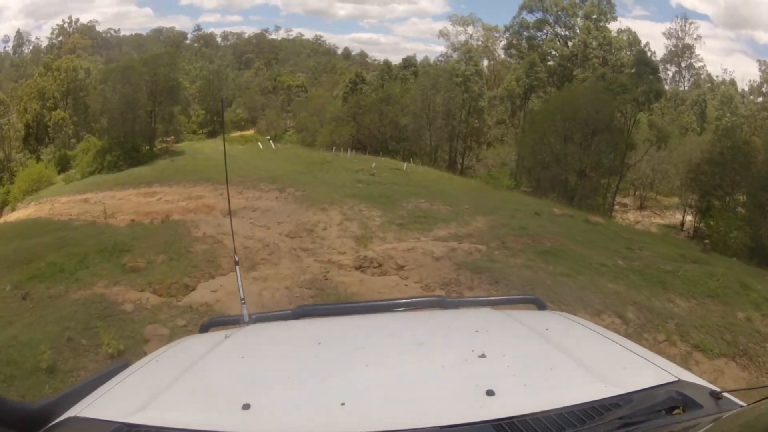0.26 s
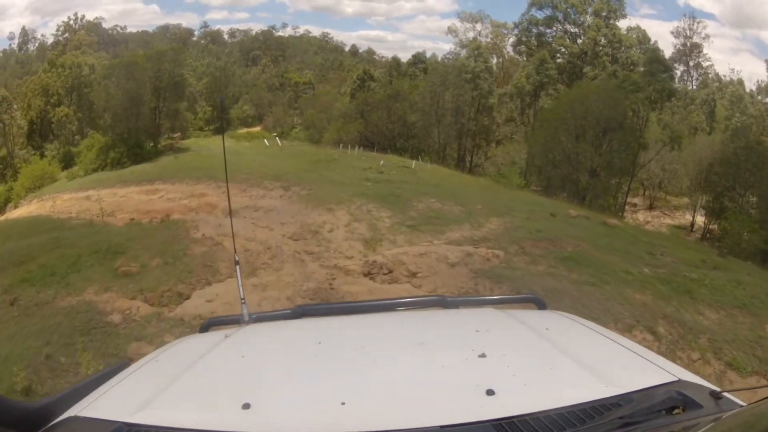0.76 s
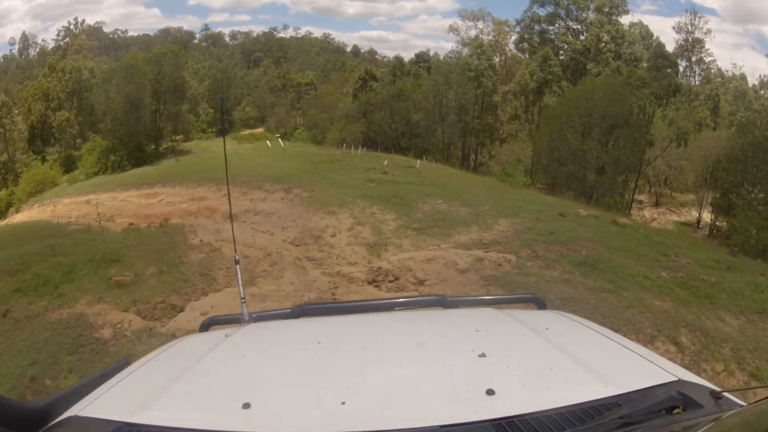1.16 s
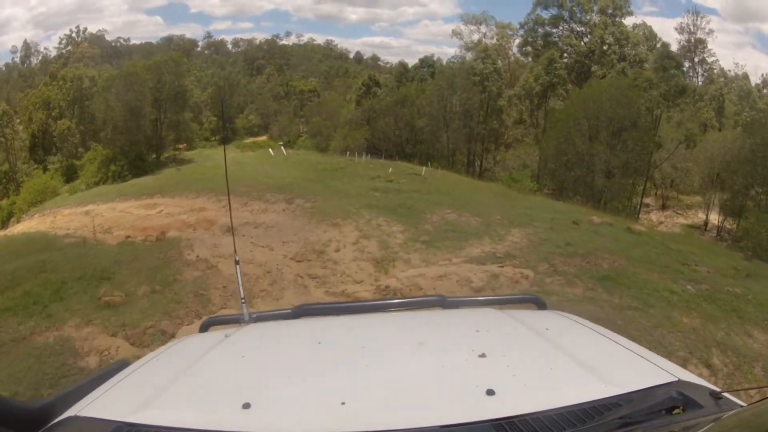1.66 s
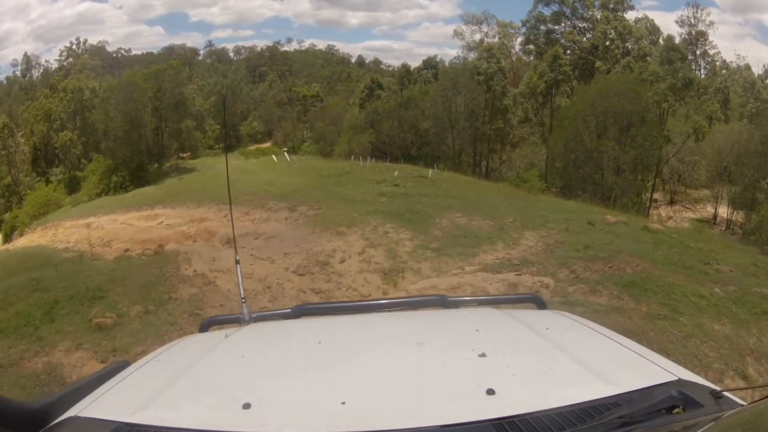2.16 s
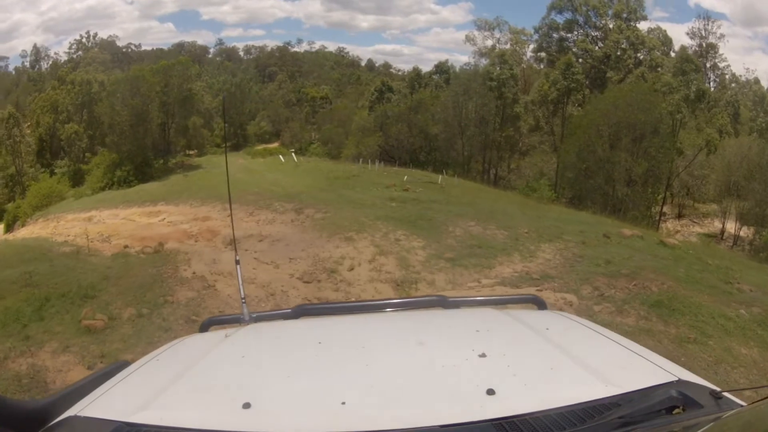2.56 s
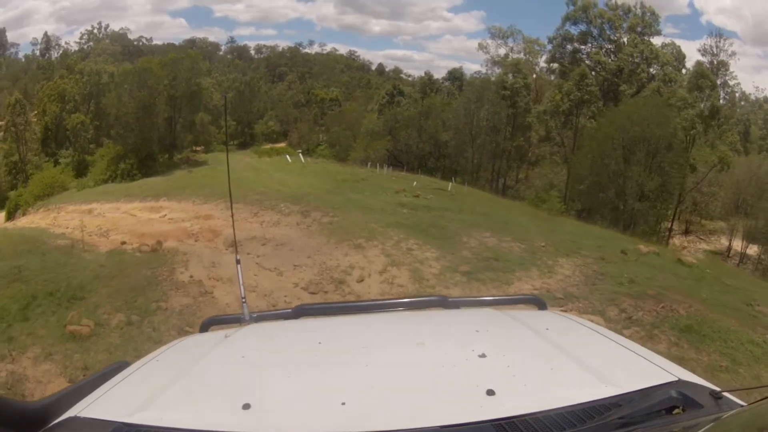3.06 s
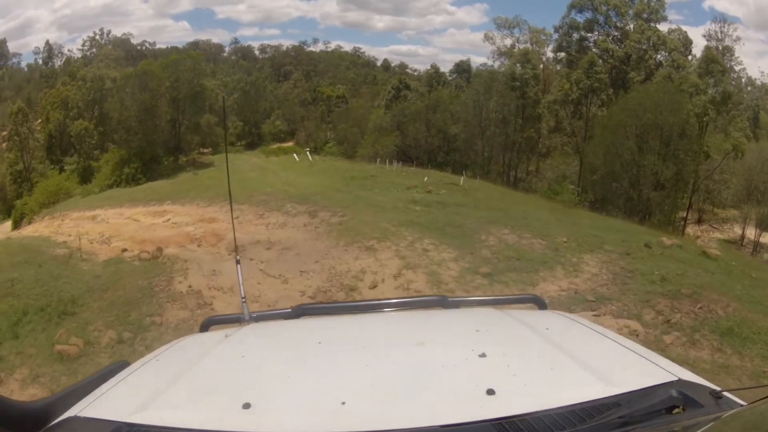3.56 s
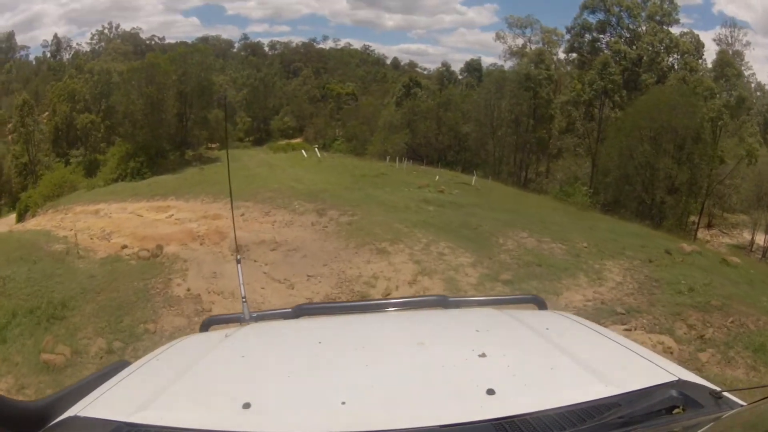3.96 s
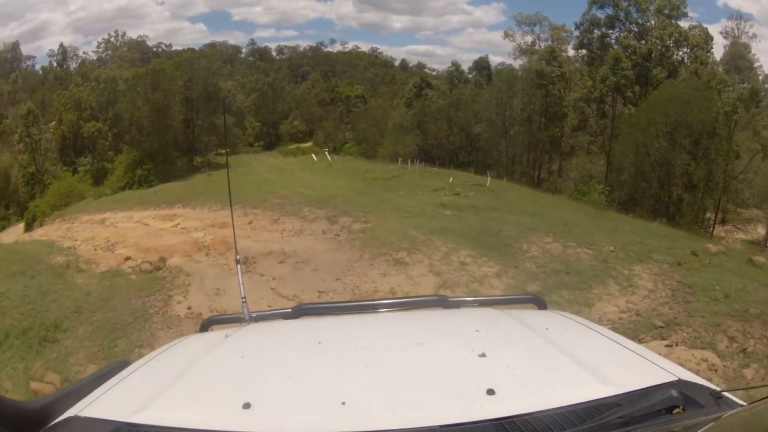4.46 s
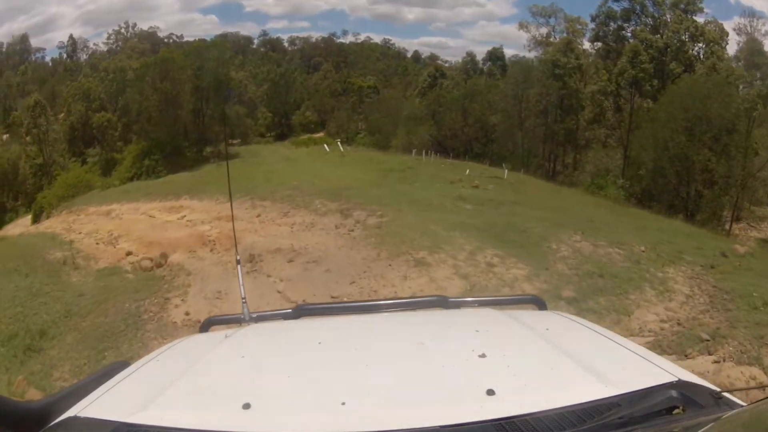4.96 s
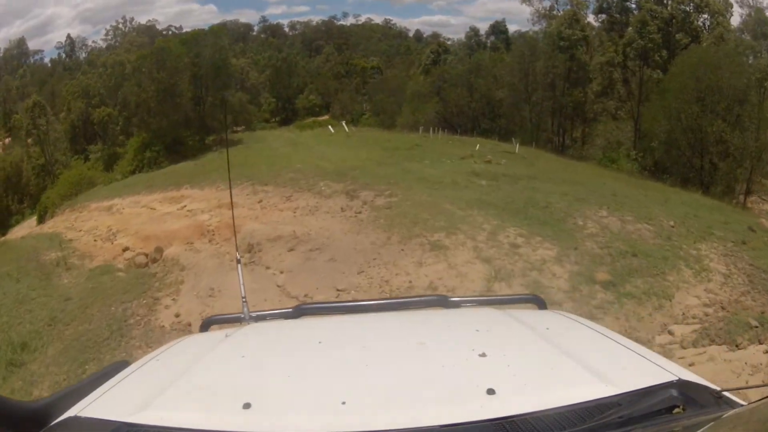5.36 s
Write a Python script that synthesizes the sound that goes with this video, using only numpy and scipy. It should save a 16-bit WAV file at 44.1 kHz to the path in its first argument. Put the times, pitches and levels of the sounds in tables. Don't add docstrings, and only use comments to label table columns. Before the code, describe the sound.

A four-cylinder diesel idles slowly along a dirt track, picked up through the body by a small sealed camera, so it is close, boxy and bass-heavy with thin, grainy treble. Throughout, about twenty-four firings a second make a deep shuddering throb, with uneven metallic clatter around two kilohertz and dull tyre rumble. From 0 to 1.5 s the ride is loosest: squeaks at 0.1 and 0.26, low trim knocks near 0.17, 0.5, 0.9, 1.1 and 1.4, faint clinks, and dry ticks around 0.3-0.4 and 1.2. A clonk, squeak and cluster of ticks return at 2.4-2.5, then a knock and clinks around 2.7-2.9. Meanwhile a roof drone near 75 Hz, at first in short swells, settles in. The idle quickens slightly after 2.5 s; a few ticks follow near 3.4. The throb dips briefly around 3.8 and 5.3, then swells strongly at the end.

```python
import sys
import numpy as np
from scipy import signal
from scipy.fft import rfft, irfft, next_fast_len
from scipy.io import wavfile
from scipy.ndimage import uniform_filter1d, map_coordinates

SR = 44100
rng = np.random.default_rng(int(sys.argv[2]) if len(sys.argv) > 2 else 0)


def generate_wav(signal):
    frames = np.transpose(np.atleast_2d(signal))
    scaled = np.clip(frames, -1, 1) * 32767
    pcm = np.round(scaled).astype(np.int16)
    wavfile.write(sys.argv[1], SR, pcm)


def amplitude_ratio(level_db):
    exponent = np.asarray(level_db, float) / 20
    return 10 ** exponent


N = 246945


def unit(x):
    return x / np.sqrt(np.mean(x ** 2) + 1e-20)


def curve(rows):
    s, value = np.transpose(rows)
    return uniform_filter1d(np.interp(np.arange(N) / SR, s, value), size=SR // 30)


def swells(rows):
    t = np.arange(N) / SR
    return sum(db * np.exp(-.5 * ((t - s) / half) ** 2) for s, db, half in rows)


def wobble(rate):
    return map_coordinates(rng.standard_normal(int(N * rate / SR) + 4), [np.arange(N) * rate / SR])


def filtered(x, response):
    m = next_fast_len(N + SR // 2)
    return irfft(rfft(x, m) * response(np.fft.rfftfreq(m, 1 / SR)), m)[..., :N]


def coloured(x, points):
    f, db = np.transpose(points)
    return unit(filtered(x, lambda hz: amplitude_ratio(np.interp(np.log(hz + 1), np.log(f + 1), db))))


def resonant(x, modes):
    def response(f):
        total = 0
        for k, (centre, width, db) in enumerate(modes):
            damping = 1j * f * width
            total = total + (-1) ** k * amplitude_ratio(db) * damping / (centre ** 2 - f ** 2 + damping)
        return total
    return unit(filtered(x, response))


def taps(rows, snap, crack, gain_db):
    out, t = np.zeros(N + SR), np.arange(SR // 5) / SR
    for s, db, hz, t60 in rows:
        fall = amplitude_ratio(-60 * t / max(t60, .003)) * (1 - np.exp(-t / 0.00007))
        tap = fall * (np.sin(2 * np.pi * hz * t) + crack * rng.standard_normal(len(t)))
        out[round(s * SR):][:len(t)] += amplitude_ratio(db + gain_db) * (tap + snap * (t == 0))
    return out[:N]


# (time [s], firing rate [Hz])
SPEED = [(0.0, 24.8), (0.23, 22.67), (0.5, 24.27), (0.76, 24.83), (1.08, 23.33), (1.5, 23.67),
         (1.98, 24.84), (2.11, 24.98), (2.37, 23.13), (2.7, 25.7), (3.26, 24.39), (3.7, 26), (3.94, 25.75),
         (4.18, 25.08), (4.44, 25.25), (4.66, 24.91), (4.91, 25.75), (5.6, 26.31)]


def engine_speed():
    rate_hz = curve(SPEED)
    return rate_hz, np.cumsum(rate_hz) / SR + .88


# (time [s], change [dB], half length [s])
SHAKE_SWELLS = [
    (1.85, -4.5, 0.14),
    (2.66, 2.5, 0.13),
    (2.87, -6, .04),
    (3.15, 4, 0.11),
    (3.8, -11, 0.042),
    (3.94, 3, 0.051),
    (4.4, 4, 0.12),
    (5.08, -3, .06),
    (5.28, -10, 0.048),
    (5.53, 8.5, 0.11),
]


def cab_level(firings):
    cab_hz, cab_width_hz, cab_db = 23.79, 2.12, -33.5
    frame_share, frame_lead = 0.22, 1.7
    push = np.exp(2j * np.pi * firings)
    pole = np.exp((2j * np.pi * cab_hz - np.pi * cab_width_hz) / SR)
    sprung = signal.lfilter([1 - abs(pole)], [1, -pole], push)
    frame = frame_share * np.exp(1j * frame_lead) * push
    return cab_db + 20 * np.log10(np.abs(sprung + frame)) + swells(SHAKE_SWELLS)


# (time [s], level [dB])
BOOM = [(0, -66), (1.7, -60.5), (2.5, -46.5), (3.0, -43.5), (5.6, -42)]
# (time [s], change [dB], half length [s])
FLEXES = [(.08, 10, 0.026), (.26, 25.5, 0.021), (.39, 26, 0.04), (.54, 21, 0.034), (1.36, 11, .03),
          (1.57, 20.5, .03), (1.87, 14.5, 0.042), (2.17, 11.5, 0.088), (2.33, -18, .03), (2.42, 7, 0.039),
          (2.7, 5, .1), (3.15, 4.5, 0.029), (3.23, -9.5, .02), (3.34, 5, 0.034), (3.42, -7.5, 0.024),
          (3.6, -7, .03), (4.13, 4, .08), (4.33, -13, 0.027), (4.59, 1.5, 0.038), (4.76, -4, .07)]


def roof_level():
    return curve(BOOM) + swells(FLEXES)


# (multiple of firing rate [-], slow level re growl [dB], fast level re growl [dB])
EXHAUST = [(2, -11, 0), (2.5, -12, -5.5), (3.5, -3, -10), (4, 2.5, -8), (5, -4, -3), (6, -5, -8),
           (7, -0.5, 0.5), (8, -3.5, -2.5), (9, -8.5, -9), (11, -8, -19.5), (13, -19.5, -16.5)]
# (centre [Hz], width [Hz], level re mean growl [dB])
MOUNT = (487, 32.8, -7.5)


def orders(firings, rate_hz):
    turn = 2 * np.pi * firings
    growl_db = -55 + wobble(12)

    def wavering(k):
        phase = k * (turn + .012 * wobble(6)) + rng.uniform(0, 7)
        return amplitude_ratio(1.5 * wobble(4)) * np.cos(phase)

    lag = 2 * np.pi * (.1 + .15 * (rate_hz - 23.5))
    shake = amplitude_ratio(cab_level(firings)) * np.cos(turn - lag)
    boom = amplitude_ratio(roof_level()) * np.cos(3 * turn + 1.85 + 0.6 * wobble(4.15))
    fast = np.clip((rate_hz - 24.2) / 1.2, 0, 1)
    growl = sum(amplitude_ratio(slow_db + fast * (fast_db - slow_db)) * wavering(k) for k, slow_db, fast_db in EXHAUST)
    hz, width, db = MOUNT
    whine = sum(wavering(k) / (1 + (2 * (k * rate_hz - hz) / width) ** 2) for k in range(18, 22))
    return np.sqrt(2) * (shake + boom + amplitude_ratio(growl_db) * growl + amplitude_ratio(growl_db.mean() + db) * whine)


CYLINDERS = [-2.5, -1, 2.5, 1.7]


def strokes(firings, spread, valve_db, scatter_db):
    stroke = firings.astype(int)
    size = rng.standard_normal((stroke[-1] + 1, 2))[stroke]
    part = firings - stroke

    def hump(centre, width):
        return np.exp(-.5 * ((part - centre) / width) ** 2)

    burn = amplitude_ratio(np.array(CYLINDERS)[stroke % 4] + scatter_db * size[:, 0]) * hump(0.3, spread)
    valve = amplitude_ratio(valve_db + scatter_db * size[:, 1]) * hump(0.73, 0.19)
    return burn + valve


# (centre [Hz], width [Hz], level [dB])
BLOCK = [(1260, 178, -13), (1540, 71, -8), (1673, 84, -10.5), (2020, 114, -5), (2240, 45, -1.5),
         (2534, 50, -5.5), (2820, 130, -14.5), (3268, 95, -10.5), (3752, 95, -12), (4530, 120, -23.5),
         (5250, 60, -22)]
# (frequency [Hz], level per Hz [dB])
HISS = [(500, -31), (900, -7.5), (1800, -19.5), (2300, 6), (3500, -6.5), (5500, -10.5), (9000, -12)]
# (centre [Hz], width [Hz], level [dB])
CASE = [(484, 36, -4.5), (863, 23.3, -8), (347, 47, -4.5)]


def clatter(firings):
    gas_hz = 2049
    drift = np.cumsum(30 * wobble(110)) / SR
    ring = np.cos(2 * np.pi * (gas_hz * np.arange(N) / SR + drift))
    knock = unit(strokes(firings, spread=0.14, valve_db=-2.5, scatter_db=3.5) * ring)
    beat = .9 + strokes(firings, spread=.11, valve_db=-2, scatter_db=1.2)

    def gritty_noise():
        return beat * amplitude_ratio(1.5 * wobble(250)) * rng.standard_normal(N)

    rung = resonant(gritty_noise(), BLOCK)
    broad = coloured(gritty_noise(), HISS)
    mount = resonant((beat + 0.35) * rng.standard_normal(N), CASE)
    mix = amplitude_ratio(-3.0) * knock + amplitude_ratio(-1.5) * rung + amplitude_ratio(-0.5) * broad + amplitude_ratio(-3.0 + wobble(2.87)) * mount
    return amplitude_ratio(-58.5) * mix


# (time [s], peak [dB], ring [Hz], t60 [s])
KNOCKS = [
    (0.169, -39.5, 283, 0.06),
    (0.533, -40.5, 266, 0.044),
    (0.891, -55, 460, 0.082),
    (0.928, -43.5, 460, 0.12),
    (1.135, -40, 241, 0.081),
    (1.363, -44, 505, 0.093),
    (1.442, -41, 257.5, 0.044),
    (2.738, -45.5, 480, 0.068),
]
# (time [s], peak [dB], ring [Hz], t60 [s])
CLINKS = [
    (0.186, -52, 864, 0.085),
    (0.361, -56, 860, 0.1),
    (0.862, -59, 850, 0.096),
    (1.198, -53.5, 860, 0.16),
    (1.365, -57, 850, 0.11),
    (2.198, -55.5, 870, 0.0772),
    (2.739, -57.5, 841, 0.11),
    (2.949, -51.5, 843.3, 0.077),
]
# (time [s], peak [dB], ring [Hz], t60 [s])
CLONKS = [
    (1.369, -50, 663, 0.075),
    (2.361, -48.5, 646, 0.064),
]
# (time [s], peak [dB], ring [Hz], t60 [s])
SQUEAKS = [
    (0.1115, -48, 1800, 0.06),
    (0.2644, -46.5, 1710, 0.051),
    (2.4442, -50, 1710, 0.041),
]


def trim_contacts():
    return taps(KNOCKS + CLINKS + CLONKS + SQUEAKS, snap=0, crack=0.074, gain_db=-0.5)


# (time [s], peak [dB], ring [Hz], t60 [s])
TICKS = [(.2662, -52, 3700, .05), (.3055, -54, 3460, .015), (.3468, -53, 3800, .01),
         (.352, -55, 3500, .015), (.4364, -46, 3780, .015), (1.192, -56, 3270, .03),
         (1.2375, -54, 3030, .015), (2.4398, -51, 4900, .012), (2.4803, -49, 3640, .022),
         (2.52, -44, 4400, .02), (2.563, -57, 3300, .03), (3.3283, -51, 3740, .02),
         (3.3658, -53, 3010, .03), (3.508, -56, 3830, .025)]


def mount_ticks():
    impacts = taps(TICKS, snap=9.4, crack=3.3, gain_db=-1.5)
    return filtered(impacts, lambda hz: 1j * hz / (2500 + 1j * hz))


# (frequency [Hz], level per Hz [dB])
RUMBLE = [(8, -7), (20, -16), (40, -6), (60, -2), (95, -7.5), (112, -11.5), (190, -8), (400, -17.5),
          (600, -23), (900, -33), (1100, -32), (2000, -66)]
# (time [s], level [dB])
JOLT = [(0, -43.5), (.7, -46.5), (1.2, -50.5), (2.3, -51.5), (2.8, -76), (5.6, -59)]
# (centre [Hz], width [Hz], level [dB])
PANEL = [(69.7, 7.2, 7.5), (80.9, 9.2, 6.5)]


def road():
    bumps = [(s, 0.31 * (db + 54.5), 0.033) for s, db, _, _ in KNOCKS + CLONKS]
    rumble_db = -58 + swells(bumps)
    lumps = amplitude_ratio(1.17 * wobble(10))
    rumble = amplitude_ratio(rumble_db + 6.5) * coloured(lumps * rng.standard_normal(N), RUMBLE)
    return rumble + amplitude_ratio(curve(JOLT)) * resonant(rng.standard_normal(N), PANEL)


def scene():
    rate_hz, firings = engine_speed()
    engine = orders(firings, rate_hz) + clatter(firings)
    return (engine + trim_contacts() + mount_ticks() + road())[None]


def slow_sampling(x):
    hold_hz = 12000
    base = filtered(x, lambda hz: np.clip((hold_hz / 2 - hz) / 450, 0, 1) ** 0.85)
    imaged = base * (1 + 2 * np.cos(2 * np.pi * hold_hz * np.arange(N) / SR))
    return filtered(imaged, lambda hz: np.sinc(hz / hold_hz) * np.exp(-1j * np.pi * hz / hold_hz))


# (frequency [Hz], level [dB])
MASK = [(4500, -125), (6000, -107), (7500, -105), (9800, -105), (10800, -100.5), (12000, -104),
        (13200, -100), (14500, -104), (15050, -100), (15400, -88), (15700, -60)]


def masked(x):
    hz, t, z = signal.stft(x, SR, window="cosine", nperseg=2048)
    power = uniform_filter1d(np.abs(z) ** 2, size=13, axis=1)
    f, db = np.transpose(MASK)
    floor_db = np.interp(hz, f, db, left=-300)[:, None]
    slow_db = 1.5 * wobble(5)[np.minimum(t * SR, N - 1).astype(int)]
    spare_db = slow_db + rng.standard_normal(len(t))
    heard = power > amplitude_ratio(2 * (floor_db - spare_db))
    return signal.istft(z * heard, SR, window="cosine", nperseg=2048)[1][:, :N]


def roll_off(x):
    return signal.sosfilt(signal.butter(12, 16080, fs=SR, output="sos"), x)


def record(dry):
    heard = masked(slow_sampling(dry))
    mix = filtered(heard, lambda hz: amplitude_ratio(1.8 * np.minimum(hz / 13000, 1) ** 4))
    return roll_off(mix)


dry = scene()
out = record(dry)
generate_wav(out)
```